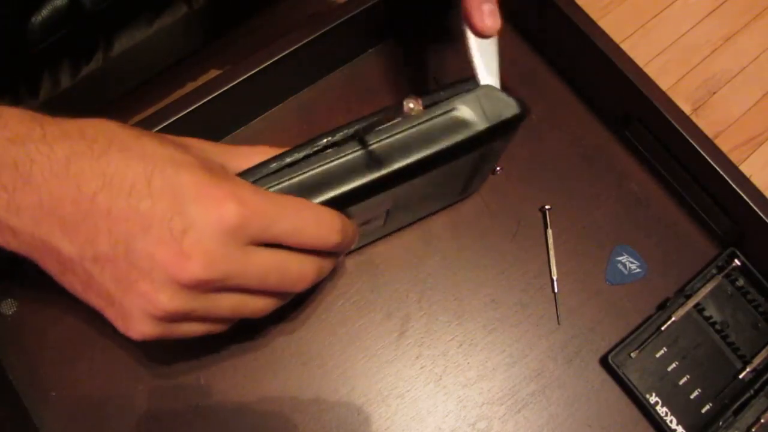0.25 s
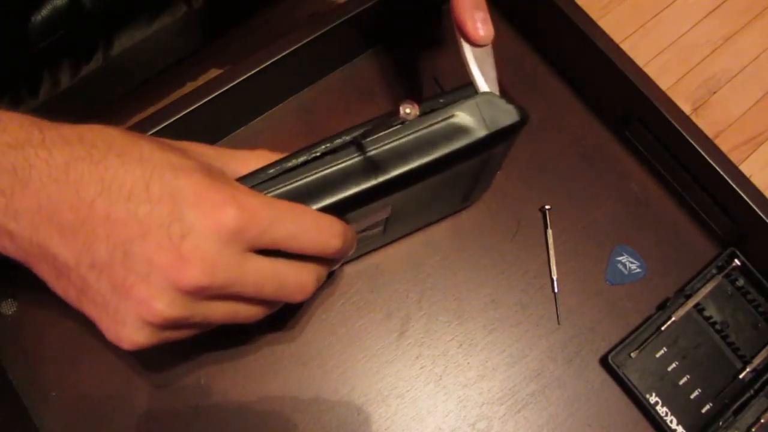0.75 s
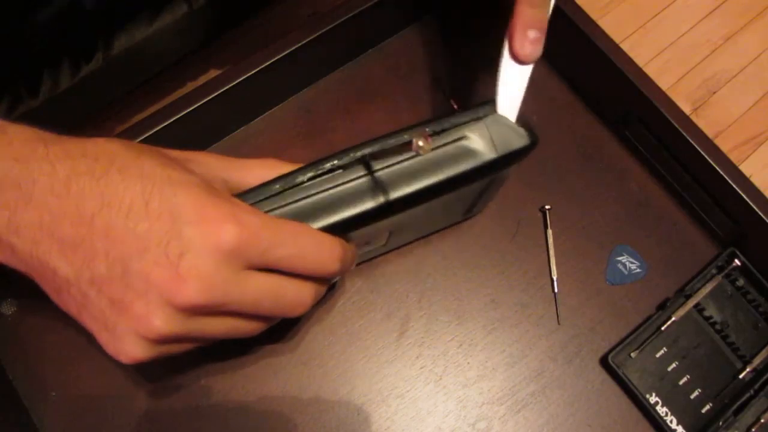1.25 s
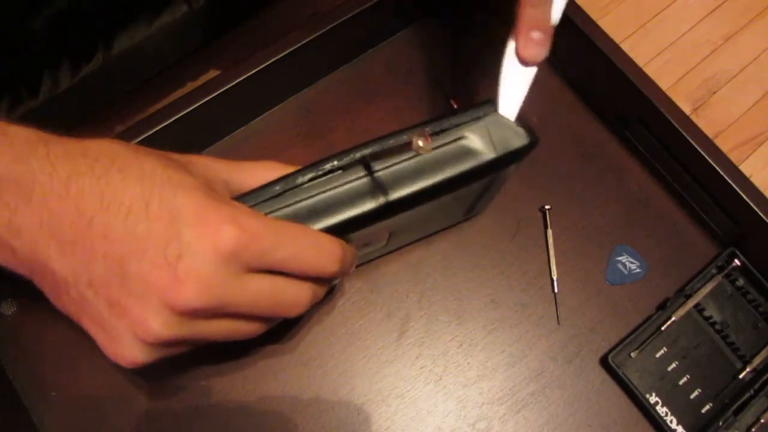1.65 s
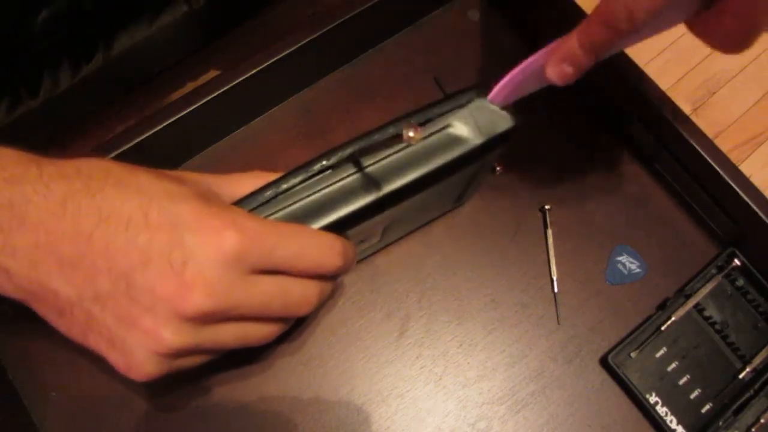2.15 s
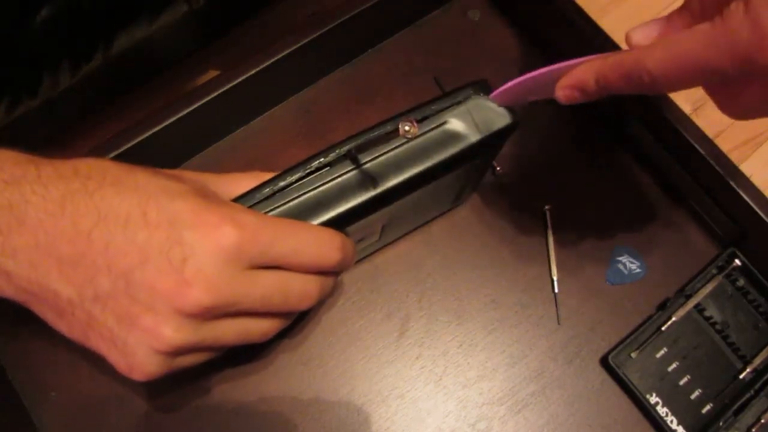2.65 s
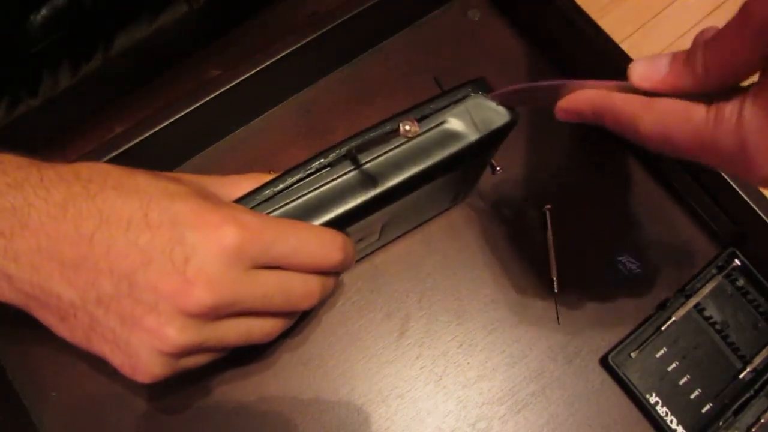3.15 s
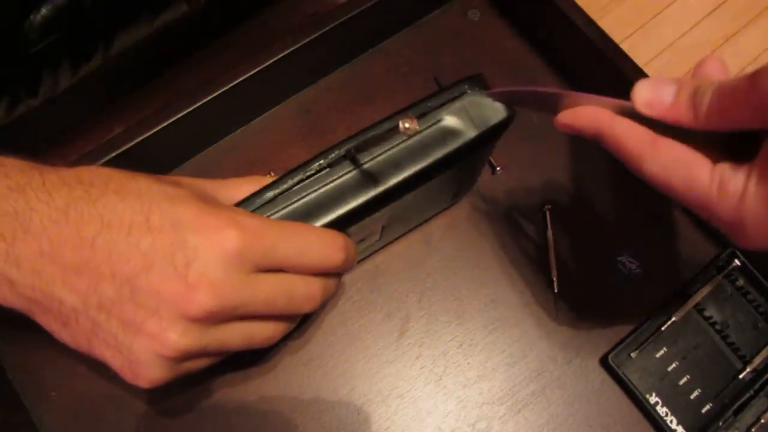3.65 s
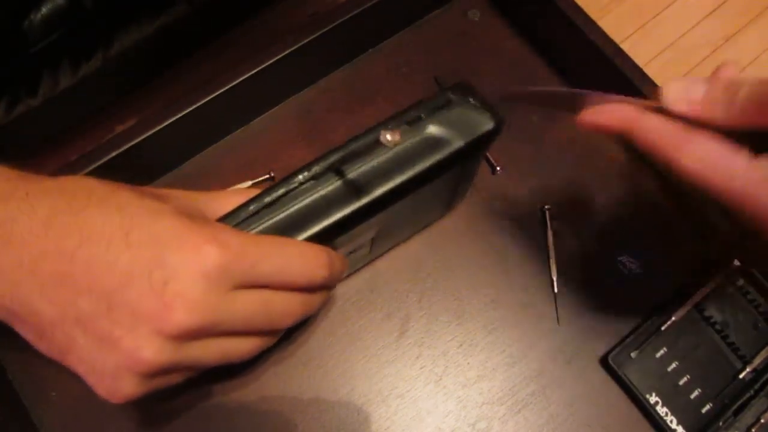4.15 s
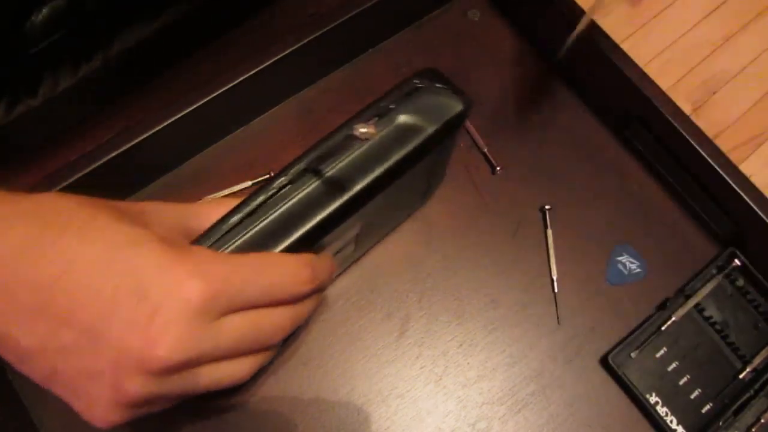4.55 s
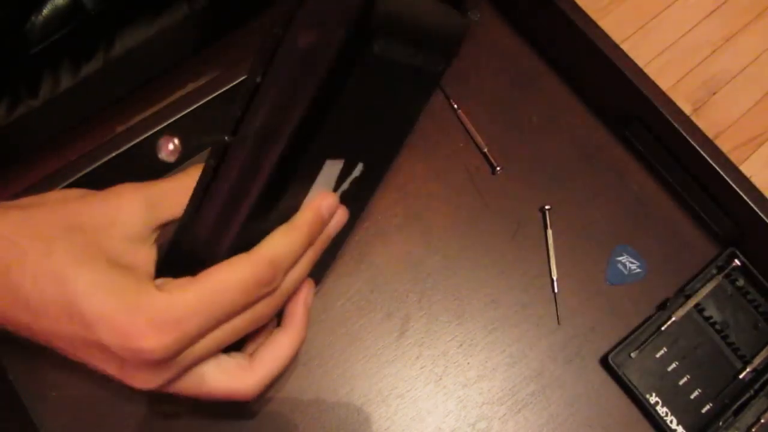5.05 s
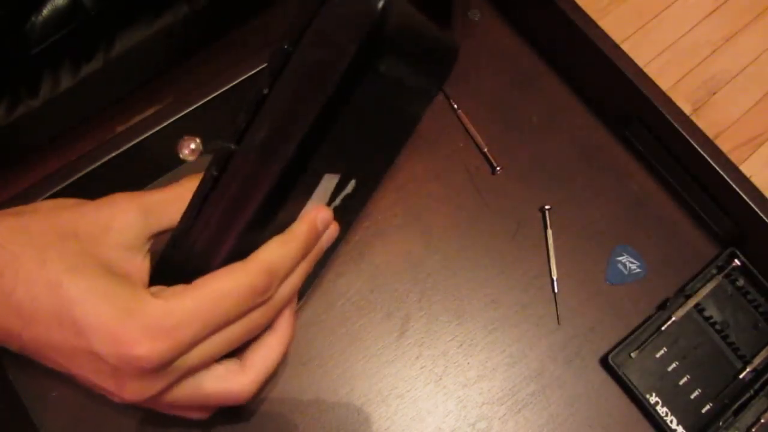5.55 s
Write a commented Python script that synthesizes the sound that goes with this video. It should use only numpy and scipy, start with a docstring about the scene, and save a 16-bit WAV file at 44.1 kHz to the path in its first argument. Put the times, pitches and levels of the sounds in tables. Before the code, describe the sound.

A thin tool pries at a plastic case, with sharp snaps, small ticks, light scraping and a few knocks on a desk.

```python
"""Prying open a plastic case.

A thin tool works at the seam of a case held on a desk in a small quiet room. Latches snap and tick
in bursts of micro-slips that excite the shell's modes; free panels ring on. Tool and hands slide
with grainy friction, the case knocks on the desk, a loose part rattles. The room answers each crack."""
import sys
import numpy as np
from scipy import signal
from scipy.fft import rfft, irfft
from scipy.io import wavfile
from scipy.ndimage import uniform_filter1d

SR = 44100
rng = np.random.default_rng(int(sys.argv[2]) if len(sys.argv) > 2 else 0)


def pcm_store(signal):
    """Save signal as 16-bit PCM."""
    levels = np.round(np.clip(np.atleast_2d(signal), -1, 1) * 32767)
    wavfile.write(sys.argv[1], SR, levels.astype(np.int16).T)


N = 256220
BLOW_SAMPLES = 4096
BLOW_T, BLOW_HZ = np.arange(BLOW_SAMPLES) / SR, np.fft.rfftfreq(BLOW_SAMPLES, 1 / SR) + 1


def amp(db):
    """dB to gain."""
    return 10 ** (np.asarray(db) / 20)


def unit_rms(x):
    """Whole array to rms 1."""
    return x / np.sqrt(np.mean(x ** 2) + 1e-20)


def unit_spectra(z):
    """Each spectrum to mean power 1."""
    return z / np.sqrt(np.mean(abs(z) ** 2, axis=-1, keepdims=True))


def curve_at(points, hz):
    """Table lookup on a log-frequency axis."""
    f, value = np.transpose(points)
    return np.interp(np.log(hz + 1), np.log(f + 1), value)


def min_phase(points):
    """Minimum-phase impulse response of a spectrum, energy 1."""
    db = np.maximum(curve_at(points, abs(np.fft.fftfreq(8192, 1 / SR))), -100)
    taps = np.fft.ifft(np.exp(np.conj(signal.hilbert(np.log(amp(db)))))).real[:4096]
    return taps / np.linalg.norm(taps)


def patches(noise, bins, frames):
    """Noise smoothed over frequency and time, rms 1."""
    return unit_rms(uniform_filter1d(uniform_filter1d(noise, bins, axis=0), frames, axis=1))


def place(near, send, start_s, near_spectra, send_spectra):
    """Sums the parts of one blow into the direct sound and the room send."""
    at = round(start_s * SR)
    fade = np.minimum(np.arange(BLOW_SAMPLES)[::-1] / 1500, 1) ** 2
    for bus, parts in ((near, near_spectra), (send, send_spectra)):
        bus[:, at:at + BLOW_SAMPLES] += fade * irfft(parts.sum(0))


# Background spectrum: f/Hz, relative density/dB
TONE_SPECTRUM = [(15, -31.5), (25, -19.5), (111, 9), (244, -0.5), (648, -8.5), (784, -14), (1390, -15),
                 (1590, -16), (3390, -20.5), (4100, -29.5), (4960, -18.5), (9260, -28.5), (15100, -62),
                 (16400, -68.5)]
# Background stereo image: f/Hz, left-right correlation
TONE_CORRELATION = [(60, -0.75), (240, -0.67), (950, 1), (3770, -0.15), (15000, -0.56)]


def room_tone(level_db=-56.5, drift_db=2.6):
    """Quiet steady noise with drifting spectral patches."""
    frames, hz = N // 256 + 5, np.fft.rfftfreq(1024, 1 / SR)
    left_re, left_im, own_re, own_im, drift = rng.standard_normal((frames, 513, 5)).T
    alike = np.clip(curve_at(TONE_CORRELATION, hz), -1, 1)[:, None]
    left = left_re + 1j * left_im
    right = alike * left + np.sqrt(1 - alike ** 2) * (own_re + 1j * own_im)
    gain = amp(curve_at(TONE_SPECTRUM, hz)[:, None] + drift_db * patches(drift, bins=12, frames=14))
    noise = signal.istft(np.array([left, right]) * gain, nperseg=1024, noverlap=768)[1]
    return amp(level_db) * unit_rms(noise[:, :N])


# Room response: f/Hz, T60/s, level/dB
ROOM_BANDS = [(100, 0.22, 2), (404, 0.28, 2), (680, 0.27, -2.5), (890, 0.47, 3), (1200, 0.23, -0.5),
              (1373, 0.34, 0.5), (2770, 0.34, -1.5), (6950, 0.34, -1), (14000, 0.18, -1)]


def room_echoes(send, build_s=0.0087):
    """Sparse reflections of random sign; each band decays at its own rate."""
    length, bands = SR // 2, np.array(ROOM_BANDS)
    taps = np.zeros((2, length))
    at = np.arange(200, length - 20, 20) + rng.integers(0, 20, (2, (length - 201) // 20))
    np.put_along_axis(taps, at, rng.choice([-1., 1.], at.shape), 1)
    taps = taps + 0.48 * taps[::-1]  # close mics share part of every echo
    hz, t, spectra = signal.stft(taps, SR, nperseg=512)
    decay = amp(-60 * t / curve_at(bands[:, :2], hz)[:, None])
    tail = signal.istft(spectra * decay, SR, nperseg=512)[1]
    spectrum = rfft(tail * np.minimum(np.arange(tail.shape[1]) / SR / build_s, 1), SR)
    flat = spectrum / np.sqrt(uniform_filter1d(abs(spectrum) ** 2, 50))
    response = irfft(flat * amp(curve_at(bands[:, ::2], np.arange(SR // 2 + 1))))[:, :length]
    return signal.fftconvolve(send, response, axes=1)[:, :N]


# Case modes: f/Hz, bandwidth at damping 1/Hz, relative level/dB
CASE_MODES = [(616, 22, 5), (676.7, 33, 9), (747, 60, 9), (844, 68, 2.5), (870, 160, -1.5), (967, 28, 6),
              (1010, 200, 10), (1102, 40, 1), (1296, 53, -2), (1380, 70, -13), (1410, 480, 7.5),
              (1700, 130, -1), (1830, 220, -1), (2173, 130, -2.5), (2356, 39, -6.5), (2280, 160, -13),
              (2650, 110, -16), (2880, 140, -15)]


def case_modes(damping):
    """One spectrum per mode: a small body radiates no bass, soft contact gives little top treble."""
    hz, width_hz, _ = np.transpose(CASE_MODES)[:, :, None]
    rings = rfft(np.exp(-np.pi * width_hz * damping * BLOW_T) * np.sin(2 * np.pi * hz * BLOW_T))
    return rings / (1 - 0.86j * hz / BLOW_HZ) ** 4 / (1 + 1j * BLOW_HZ / (2 * hz))


def uneven_grip(rub, depth_db):
    """Bands of a rubbing sound waver independently."""
    spectra = signal.stft(rub, nperseg=256)[2]
    drift = patches(rng.standard_normal(spectra.shape[:0:-1]).T, bins=4, frames=9)
    return signal.istft(spectra * unit_rms(amp(depth_db * drift)), nperseg=256)[1][:, :N]


# Desk top under a slide: f/Hz, relative density/dB
DESK_SPECTRUM = [(15, -41.5), (25, -11), (150, -6.5), (267, -8.5), (322, -9.5), (430, -9.5), (500, -13.5),
                 (650, -39.5), (1100, -120)]
# Sliding skin: f/Hz, relative density/dB
HISS_SPECTRUM = [(710, -50.5), (1200, -12.5), (1350, -14), (1720, 0), (2150, -4), (2600, -3.5), (3250, -6),
                 (4200, -10.5), (5600, -9), (7000, -12.5), (14500, -32.5), (16400, -38)]
# Strokes of tool and hands: peak t/s, rise/s, fall/s, scrape drive/dB, rumble drive/dB, hiss drive/dB
STROKES = [(0.03, 0.13, 0.12, -46.5, -51, -45.5), (0.178, 0.012, 0.057, -42, -43.5, -63),
           (0.519, 0.38, 0.1, -54, -55, -56), (0.714, 0.072, 0.07, -55, -55, -57),
           (0.834, 0.032, 0.032, -52.5, -55, -53), (0.921, 0.043, 0.11, -57, -58.5, -59),
           (1.628, 0.032, 0.011, -64.5, -83.5, -57.5), (1.851, 0.055, 0.036, -50, -56.5, -50),
           (2.025, 0.011, 0.067, -61.5, -70, -65), (2.6, 0.51, 1, -68, -65.5, -76),
           (3.75, 0.28, 0.54, -72, -66, -71.5), (2.9, 0.026, 0.042, -52, -59, -61),
           (3.086, 0.01, 0.018, -34.5, -47.5, -48), (3.214, 0.04, 0.056, -50.5, -53.5, -59),
           (3.535, 0.029, 0.034, -56.5, -57, -58), (4.175, 0.025, 0.021, -41, -58.5, -43.5),
           (4.55, 0.06, 0.069, -60, -74, -53), (4.66, 0.048, 0.025, -66, -71, -53.5),
           (4.86, 0.13, 0.031, -53, -61, -59), (5.17, 0.058, 0.029, -92.5, -73.5, -74.5)]


def slides(flatness=2.5, hollow_hz=730):
    """Stick-slip friction noise drives case scrape, desk rumble and skin hiss."""
    t, drive = np.arange(N) / SR, np.zeros((3, N))
    for peak_s, rise_s, fall_s, *db in STROKES:
        stroke = np.exp(-(abs(t - peak_s) / np.where(t < peak_s, rise_s, fall_s)) ** flatness)
        drive += stroke * amp(db)[:, None]
    mid, side = rng.standard_normal((2, 3, 1, N))
    side *= np.array([0.45, 1.3, 0.5])[:, None, None]  # stereo width: scrape, rumble, hiss
    quick, slow = (unit_rms(uniform_filter1d(rng.standard_normal(N), span)) for span in (150, 1100))
    stick_slip = unit_rms(amp(1.9 * quick + 2.1 * slow))
    friction = np.concatenate([mid + side, mid - side], axis=1) * drive[:, None] * stick_slip
    octaves_off = abs(np.log2(np.transpose(CASE_MODES)[0] / hollow_hz))
    hollow = irfft(amp(-34 * octaves_off) @ case_modes(damping=1.8))
    bodies = hollow / np.linalg.norm(hollow), min_phase(DESK_SPECTRUM), min_phase(HISS_SPECTRUM)
    scrape, rumble, hiss = (signal.oaconvolve(force, body[None], axes=1)[:, :N]
                            for force, body in zip(friction, bodies))
    return scrape + rumble + uneven_grip(hiss, depth_db=0.5)


# Free panels, by name: f/Hz, T60/s
PANEL_MODES = {"back": (720, 0.22), "lid": (938, 0.64), "side": (1095, .19), "rib": (1715, 0.15),
               "edge": (1940, .3), "corner": (2390, 0.13), "tab": (5300, 0.056)}
# Blows that ring a panel: t/s, panel, level/dB
PANEL_BLOWS = [(0.27, "back", -26.5), (0.27, "side", -26), (0.966, "side", -28.5), (0.96, "corner", -41),
               (1.142, "side", -57.5), (2.247, "rib", -56), (2.793, "corner", -44), (2.879, "rib", -43),
               (2.879, "tab", -34.5), (3.072, "tab", -45), (3.072, "rib", -43), (3.1, "rib", -46),
               (3.206, "rib", -47), (3.249, "rib", -45), (3.998, "lid", -35), (3.998, "side", -24),
               (3.998, "edge", -32.5), (4.173, "back", -53), (5.212, "corner", -39), (5.225, "corner", -50),
               (5.536, "back", -29), (5.536, "rib", -43), (5.692, "back", -37), (5.692, "rib", -35.5),
               (5.692, "corner", -42)]


def panel_rings(rise_s=0.003, waver_depth=0.8, waver_s=0.007):
    """Free panels ring on after a blow, wavering in level and pitch, with their own phase per mic."""
    t, out = np.arange(SR // 2) / SR, np.zeros((2, N + SR))
    span = round(waver_s * SR)
    phases = rng.random((len(PANEL_BLOWS), 2))
    noises = rng.standard_normal((len(PANEL_BLOWS), 2, 2, len(t)))
    for (start_s, panel, db), (offset, spread), noise in zip(PANEL_BLOWS, phases, noises):
        hz, t60_s = PANEL_MODES[panel]
        drift = waver_depth * unit_rms(uniform_filter1d(uniform_filter1d(noise, span), span))
        waver = 1 + drift[0] + 1j * drift[1]
        phase = 2 * np.pi * (hz * t + offset) + spread * np.array([[0.75], [-0.75]])
        envelope = amp(db - 60 * t / t60_s) * np.minimum(t / rise_s, 1)
        at = round(start_s * SR)
        out[:, at:at + len(t)] += envelope * (waver * np.exp(1j * phase)).imag
    return out[:, :N]


# Modes of a small hard part: f/Hz, half-width/Hz, relative level/dB
LOOSE_PART_MODES = [(2464, 170, 2.5), (4520, 340, -4), (6600, 490, -1), (7080, 300, -8.5),
                    (9500, 770, -8.5), (10500, 600, -15.5), (13100, 700, -14)]
# Its contacts as the case tips: t/s, level/dB, tilt/(dB/oct), contact decay/ms
LOOSE_PART_HITS = [(4.981, -24, 2, 5.7), (5.2095, -15.5, 3, 3.5), (5.2145, -15, 3, 5.5),
                   (5.224, -12, 0.5, 4.2), (5.28, -31.5, 10, 2.4), (5.3906, -36.5, 4, 4.3),
                   (5.412, -39.5, 6.5, 2.3), (5.419, -39, 3.5, 2.7), (5.441, -41.5, 5, 3.5),
                   (5.546, -34.5, 3, 2.1), (5.712, -19, -1, 3), (5.744, -49, -5, 2.5), (5.751, -42, 3, 2.5)]


def rattles(near, send, rise_s=0.00037, send_db=-11.5):
    """Short noisy contacts ring the loose part."""
    t, (hz, width_hz, mode_db) = BLOW_T, np.transpose(LOOSE_PART_MODES)[:, :, None]
    modes = unit_spectra(rfft(t * np.exp(-2 * np.pi * width_hz * t) * np.sin(2 * np.pi * hz * t)))
    for start_s, level_db, tilt_db, decay_ms in LOOSE_PART_HITS:
        noise = rng.standard_normal((2, BLOW_SAMPLES))
        burst = np.exp(-1000 * t / decay_ms) * np.minimum(t / rise_s, 1)
        contact = rfft((noise + 0.12 * noise[::-1]) * burst)
        body = (amp(mode_db + tilt_db * np.log2(hz / 6000)) * modes).sum(0)
        ring = amp(level_db) * unit_spectra(body * contact)[None]
        place(near, send, start_s, ring, ring * amp(send_db))


# Case on desk: t/s, thud gain/dB, thud f/Hz, deep thump gain/dB
DESK_KNOCKS = [(0.173, -28.5, 149, -47), (0.2044, -23.5, 200, -52), (0.2667, -19, 334, -29),
               (0.447, -27.5, 250, -50), (1.065, -39, 234, -54), (1.3119, -30.5, 238, -8),
               (1.7731, -35, 348, -35), (1.8222, -28.5, 101, -47), (1.834, -38, 305, -33),
               (2.576, -29, 392, -36), (2.696, -41, 193, -34.5), (2.7943, -24.5, 360, -50),
               (2.8809, -20, 394, -47), (2.8927, -22.5, 430, -45), (3.022, -26, 240, -55),
               (3.0706, -22.5, 360, -23), (3.1801, -28, 221, -48), (3.203, -26.5, 457, -48),
               (3.4182, -29.5, 262, -39), (3.8317, -26, 266, -40), (3.995, -11, 383, 4.5),
               (4.1735, -28, 356, -44), (5.2058, -20.5, 366, -11), (5.2134, -17, 125, -17),
               (5.5347, -26.5, 438, -37.5), (5.692, -28.5, 270, -46), (5.742, -35, 132, -59)]


def desk_knocks(near, send, thump_rise_s=0.0045, thud_send_db=-5, thump_send_db=-24):
    """The desk swings once or twice, with a short, deep thump out of phase between left and right."""
    t = BLOW_T
    pulse = t / thump_rise_s * np.exp(-t / thump_rise_s) * np.array([[0.6], [-1]])
    thump = rfft(pulse) / (1 - 55j / BLOW_HZ)  # 55 Hz high-pass
    for start_s, thud_db, hz, thump_db in DESK_KNOCKS:
        swing = np.exp(-t * hz / 0.89) * np.sin(2 * np.pi * hz * t)
        mic_gains = np.clip([[1], [hz / 150 - 0.9]], -1, 1)  # deepest thuds arrive out of phase
        thud = rfft(swing * mic_gains) / (1 - 0.35j * hz / BLOW_HZ)
        parts = np.array([amp(thud_db) * thud, amp(thump_db) * thump])
        place(near, send, start_s, parts, parts * amp([thud_send_db, thump_send_db])[:, None, None])


# Crack of the plastic: f/Hz, relative density/dB
CRACK_SPECTRUM = [(300, -28), (1100, -6), (1760, -7), (3000, -4), (4100, -5), (4860, -2), (6230, -6),
                  (6980, -4.5), (12300, -22), (15000, -22.5), (15700, -28.5), (16400, -47)]
# Taps on the shell: t/s, wall/dB, hollow/dB, crack/dB, crack tilt/(dB/oct), wall focus f/Hz,
# contact decay/ms
SHELL_TICKS = [(0.1746, -13, -4.5, -19, -2.5, 1790, 11.5), (0.2064, -41, -28, -48, -4, 1300, 2.2),
               (0.4458, -36, -25, -30, .1, 1440, 3.2), (0.641, -52, -27.5, -28.5, -7, 3000, 2),
               (1.5521, -34, -39.5, -35.5, -6.5, 1570, 6.5), (1.642, -57.5, -27.5, -40, -4, 1800, 1.7),
               (1.673, -32, -34, -33, -8, 2380, 1.1), (1.7734, -36, -17, -31, -1, 2980, 6),
               (1.79, -42.5, -21, -27.5, 5, 2500, 5), (1.8212, -24, -14, -26, -3, 2380, 1.5),
               (1.842, -17, -11.5, -10.5, -1, 1980, 26), (1.895, -37, -44, -25, 2, 2100, 0.62),
               (2.0173, -32, -22, -28, -0.5, 1700, 1.8), (2.04, -31.5, -42.5, -43, 6.5, 1750, 1.26),
               (2.2185, -30, -60, -53.5, -3.5, 1654, 2.5), (2.245, -30, -31, -36.5, -24, 1720, 5.7),
               (2.3522, -23.5, -31.5, -27.5, -12, 1940, 2.2), (2.576, -25, -22, -33, -0.5, 1455, 6.9),
               (2.605, -28, -27, -33, -4.5, 1495, 2.3), (2.696, -24.5, -21.5, -27, -1, 1620, 3.8),
               (2.7917, -27, -13, -24.5, -3, 2400, 4.9), (2.8029, -19.5, -29, -26, -6, 1780, 8),
               (2.8915, -12.5, -10, -14.5, -4, 1300, 4.7), (2.917, -24.5, -32, -39, -10, 1780, 6),
               (3.047, -23, -18.5, -23.5, -4, 1820, 11), (3.0991, -9.5, -5.5, -14.5, -3.5, 1610, 2.4),
               (3.155, -25.5, -21, -35, -12, 1740, 5.7), (3.178, -28.5, -33, -40, -1, 1480, 2),
               (3.2042, -16.5, -12.5, -22, -1, 1700, 8.5), (3.218, -20.5, -17, -25, -6, 1730, 10),
               (3.233, -20, -20, -27, -7, 1720, 3.5), (3.2474, -19.5, -14, -24, -22, 1730, 4.1),
               (3.301, -34, -55, -40, 11, 1790, 1.4), (3.42, -43, -29, -47.5, -4, 2450, 13),
               (3.5414, -22, -36, -27.5, -7.5, 2540, 2.6), (3.8304, -35, -21, -42, 4, 1220, 2.9),
               (4.1723, -15.5, -24, -11.5, -6.5, 2960, 1.4), (5.2062, -30.5, -4.5, -29, -1.5, 2400, 1.6),
               (5.2122, -17, -15, -25, 8, 2420, 19), (5.223, -23, -36, -29, 10, 2390, 4.1),
               (5.784, -25, -42, -14.5, -1, 2880, 4.5), (5.793, -35, -23, -12.5, -2, 1990, 4.8)]
# Latches: t/s, wall/dB, hollow/dB, crack/dB, crack tilt/(dB/oct), wall focus f/Hz, hollow focus f/Hz,
# contact decay/ms, left over right/dB, base send/dB, off-focus fall/(dB/oct), left-right likeness
LATCH_SNAPS = [(0.2692, 7.5, 12.5, 10, -3, 1480, 860, 2.55, 1.5, -9.5, 21, 0.19),
               (0.392, -5, -7, 8.5, -2.5, 2210, 703, 3.4, -2, -10.5, 25, 0.45),
               (0.9587, 6.5, 7.5, 9, -6, 1593, 700, 2.2, 0, -10.5, 2.5, 0.41),
               (1.3129, 5.5, 1.5, 9.5, 4, 1864, 826, 2.35, 0, -9.5, 13, 0.43),
               (2.8783, -9.5, -3.5, -15, -0.5, 1520, 690, 5.6, -1.5, -12, 37.5, 0.5),
               (3.0706, -8, -6, -5, 0.5, 1700, 600, 3.1, 2, -12, 26, 0),
               (3.9964, 10.5, 7.5, 8.5, 1, 1574, 982, 2.9, -1, 0, 1.5, 0.38),
               (5.5344, -5.5, 2, -9.5, -8, 1900, 642, 4.6, -0.5, -12.5, 24, 0.56),
               (5.69, -5.5, -7, -9, -1, 1920, 715, 5.5, 1.5, -12, 14.5, 0.35)]


def snaps_and_ticks(near, send, rise_s=0.0022, hollow_below_hz=1200):
    """Each blow is a burst of uneven micro-slips: a bright crack plus wall and hollow-box modes."""
    # ticks share hollow focus, pan, send, fall and likeness
    ticks = [(*row[:6], 632, row[6], -2, -14, 30, 0.57) for row in SHELL_TICKS]
    blows = [*LATCH_SNAPS, *ticks]
    noises = rng.standard_normal((len(blows), 2, BLOW_SAMPLES))  # in-phase and anti-phase at the mics
    grits = rng.exponential(1, (len(blows), BLOW_SAMPLES))
    gripped = case_modes(damping=0.91)  # held in the hand
    blurred = case_modes(damping=1.9)  # far off, all faces add up and no mode stands out
    mode_hz, _, mode_db = np.transpose(CASE_MODES)
    is_hollow = mode_hz < hollow_below_hz
    crack_colour = rfft(min_phase(CRACK_SPECTRUM))
    octaves = np.log2(np.clip(BLOW_HZ, 3000, 16000) / 6000)
    for blow, noise, grit in zip(blows, noises, grits):
        start_s, *part_db, tilt_db, wall_hz, hollow_hz, decay_ms, pan_db, send_db, fall_db, alike = blow
        burst = (1.4 + grit) * np.exp(-1000 * BLOW_T / decay_ms) * np.minimum(BLOW_T / rise_s, 1)
        slips = rfft(noise * burst)
        flat_slips = slips / np.sqrt(uniform_filter1d(abs(slips) ** 2, 50))
        crack = crack_colour * amp(tilt_db * octaves) * flat_slips
        octaves_off = abs(np.log2(mode_hz / np.where(is_hollow, hollow_hz, wall_hz)))
        mode_gain = amp(mode_db - fall_db * octaves_off)[:, None, None]
        to_mics = np.sqrt([1 + alike, 1 - alike]) * np.array([[1, 0.9], [1, -1.33]])
        level = amp(part_db)[:, None, None] * amp([[pan_db / 2], [-pan_db / 2]])
        radiated = []
        for modes in (gripped, blurred):
            rings = mode_gain * unit_spectra(modes[:, None] * slips)
            parts = np.array([rings[~is_hollow].sum(0), rings[is_hollow].sum(0), crack])
            radiated.append(level * unit_spectra(to_mics @ unit_spectra(parts)))
        close, distant = radiated
        send_gain = amp(send_db + np.array([2.5, 4.0, 0.1]))  # wall, hollow, crack
        place(near, send, start_s, close, distant * send_gain[:, None, None])


def scene(crossfade_s=1.0):
    """All sources; three echo patterns crossfade steadily so the tail does not ring on fixed pitches."""
    near, send = np.zeros((2, 2, N + BLOW_SAMPLES))
    snaps_and_ticks(near, send)
    desk_knocks(near, send)
    rattles(near, send)
    rub, ring = slides(), panel_rings()
    send = send[:, :N] + amp(-4.5) * rub + amp(-40.5) * ring
    turn = np.pi * np.arange(N) / SR / crossfade_s
    echoes = sum(room_echoes(send * np.sqrt(2 / 3) * np.sin(turn + k * np.pi / 3)) for k in range(3))
    return near[:, :N] + rub + ring + echoes + room_tone()


def record(dry, highpass_hz=58, lowpass_hz=16450, threshold_db=-32, recovery_db_per_s=1.2):
    """Bass roll-off, gain control that ducks after loud snaps, soft overload, band limit."""
    dry = signal.sosfilt(signal.butter(2, highpass_hz, "high", fs=SR, output="sos"), dry)
    power_db = 10 * np.log10(abs(uniform_filter1d((dry ** 2).mean(0), 400)) + 1e-12)
    cut_db = 0.16 * np.maximum(power_db - threshold_db, 0)
    recovery_db = np.arange(N) * recovery_db_per_s / SR
    held_db = np.maximum.accumulate(cut_db + recovery_db) - recovery_db
    duck_db = signal.lfilter([0.003], [1, -0.997], held_db)  # 7.5 ms smoothing
    limited = np.tanh(dry / amp(duck_db))
    lowpass = signal.firwin(511, lowpass_hz, window=("kaiser", 9), fs=SR)
    return signal.oaconvolve(limited, lowpass[None], "same")


dry = scene()
out = record(dry)
pcm_store(out)
```